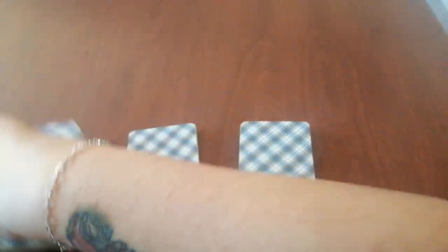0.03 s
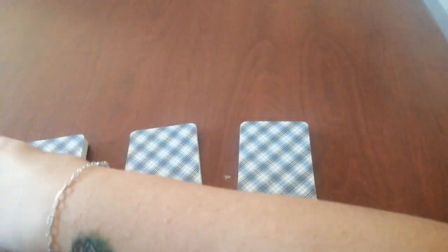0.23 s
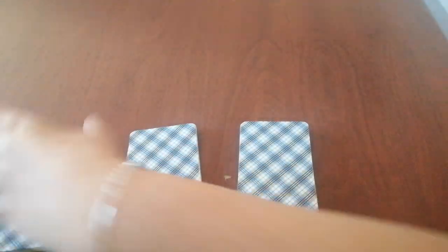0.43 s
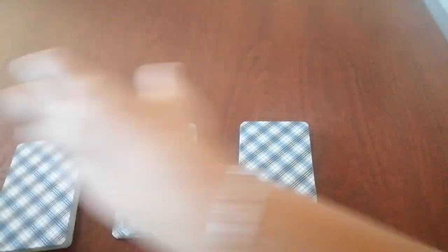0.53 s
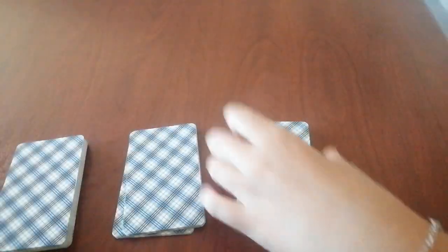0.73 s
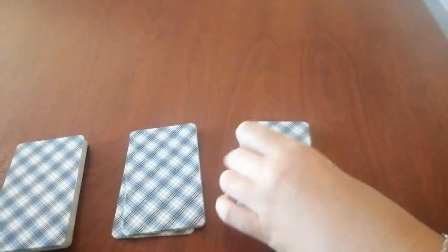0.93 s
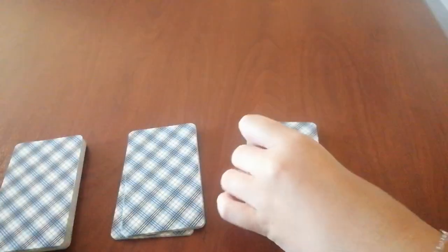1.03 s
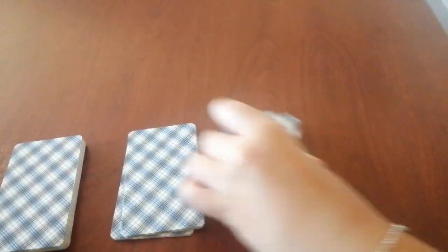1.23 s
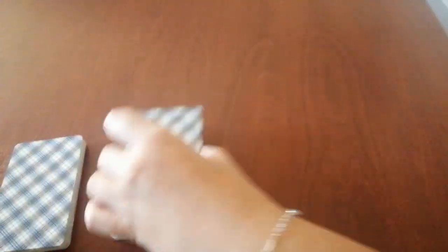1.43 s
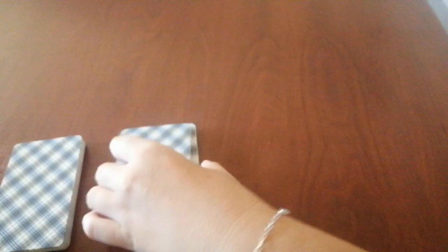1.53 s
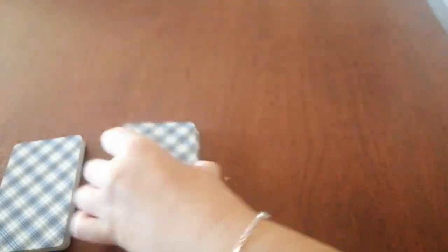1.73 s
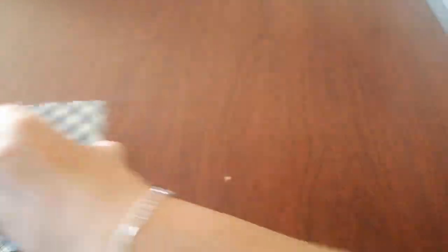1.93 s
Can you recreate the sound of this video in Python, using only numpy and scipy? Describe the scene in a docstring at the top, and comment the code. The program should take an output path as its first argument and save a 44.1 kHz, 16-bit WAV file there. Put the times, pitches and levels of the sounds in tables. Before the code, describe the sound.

Two close knuckle raps thud on cards lying on a wooden table, about a second and a half apart, the first with a bracelet click. Faint card rustle and low room noise lie between them in a small, echoing room.

```python
"""In a small, echoing room, a fist raps twice on playing cards lying on a wooden table, close by.
The knuckles land one after another, clap the cards and set the table top booming.
Just after the first rap, a metal bracelet clicks on the wood. The swinging arm pushes a little air,
and the hand brushes faintly over the cards around the raps, above low room noise."""
import sys
import numpy as np
from scipy import signal
from scipy.fft import rfft, irfft
from scipy.io import wavfile
from scipy.ndimage import uniform_filter1d

SR = 44100
rng = np.random.default_rng(int(sys.argv[2]) if len(sys.argv) > 2 else 0)


def store_wav(level_fs):
    """Save 16-bit WAV to argv[1]."""
    pcm = np.round(np.clip(np.atleast_2d(level_fs), -1, 1) * 32767)
    wavfile.write(sys.argv[1], SR, pcm.T.astype(np.int16))


N = 88200
T = np.arange(N) / SR


def amp(db):
    """Turns decibels into a gain."""
    return 10 ** (np.asarray(db) / 20)


def unit(x):
    """Scales a sound to an average power of one."""
    return x / np.sqrt(np.mean(x ** 2) + 1e-20)


def read(points, hz):
    """Looks up a table's value at any frequency."""
    f, value = np.transpose(points)
    return np.interp(np.log(hz + 1), np.log(f), value)


def pan(db):
    """Left and right gains; positive dB leans left."""
    return amp(np.array([[db], [-db]]) / 2)


def swell(s, width):
    """A bell-shaped rise and fall, peaking at s seconds."""
    return np.exp(-.5 * ((T - s) / width) ** 2)


def fade(t, fade_s):
    """Dies away by 60 dB in the fade time."""
    return np.exp(-np.log(1000) * t / fade_s)


def add(mix, s, sound):
    """Mixes a sound in at s seconds."""
    part = mix[:, round(s * SR):][:, :sound.shape[-1]]
    part += sound[..., :part.shape[-1]]


def convolve(x, response):
    """Plays x through something, given its answer to one tap."""
    return signal.fftconvolve(np.atleast_2d(x), np.atleast_2d(response), axes=1)[:, :N]


def colour(x, tone, size=4096):
    """Gives x a tone without smearing it earlier in time."""
    log_gain = np.log(amp(read(tone, abs(np.fft.fftfreq(size, 1 / SR)))))
    response = np.fft.ifft(np.exp(np.conj(signal.hilbert(log_gain)))).real
    return convolve(x, response[:size // 2])


def pair(likeness):
    """White noise, left and right: likeness 1 is the same, 0 unrelated, -1 opposite."""
    a, b = rfft(rng.standard_normal((2, N)))
    alike = np.clip(read(likeness, np.fft.rfftfreq(N, 1 / SR)), -1, 1)
    mid, side = a * np.sqrt((1 + alike) / 2), b * np.sqrt((1 - alike) / 2)
    return irfft(np.array([mid + side, mid - side]), N)


def noise(tone):
    """Steady noise with the given tone, its bass alike on both sides."""
    # Each row: frequency in Hz, left-right likeness.
    likeness = [(30, 0.74), (200, 0.93), (600, 0.2), (1500, 0), (5000, 0), (15000, 0.02)]
    gain = amp(read(tone, np.fft.rfftfreq(N, 1 / SR)))
    return unit(irfft(rfft(pair(likeness)) * gain, N))


def room_noise(level_db=-56):
    """A low, steady rumble with a faint hiss."""
    # Each row: frequency in Hz, relative level in dB.
    tone = [(20, -2.5), (45, -3), (81, -7.5), (125, -3.5), (170, -3.5), (270, -11.5), (350, -12.5),
            (470, -23), (610, -21), (1000, -26.5), (1800, -31.5), (2800, -28.5), (4000, -37.5), (5300, -31),
            (7000, -34.5), (10000, -39.5), (14000, -35.5), (14900, -25.5), (15500, -55.5), (16000, -25)]
    return amp(level_db) * noise(tone) * pan(-2)


def arm_air(level_db=-51.5):
    """The swinging arm pushes air in one soft, deep puff."""
    # Each row: frequency in Hz, relative level in dB.
    tone = [(15, 12), (30, -7), (55, -3), (150, -5), (1000, -73)]
    return amp(level_db) * swell(s=0.048, width=0.091) * noise(tone)


def brushes(grain_db=3):
    """Skin slides over card: a soft rub and a grainy hiss."""
    # Each row: peak time in seconds, width in seconds, rub level in dB, hiss against rub in dB.
    strokes = [(0.093, 0.034, -69, -5.5), (0.185, 0.042, -64.5, -9.5), (1.127, 0.024, -59, -8.5),
               (1.262, 0.033, -57.5, -34), (1.328, 0.0069, -57, -17), (1.343, 0.0079, -71, 10.5),
               (1.728, 0.067, -66, -1.5)]
    # Each row of both: frequency in Hz, relative level in dB.
    rub_tone = [(40, -25), (150, 7.5), (320, 0), (600, -9.5), (1500, -15), (4000, -52), (16000, -62)]
    hiss_tone = [(200, -44), (1600, -1), (3000, -2), (4000, -6.5), (5500, 1), (8000, -9.5), (11000, -14),
                 (15000, -20), (16000, -30)]
    grains = rng.standard_normal((2, N)) * amp(grain_db * np.minimum(rng.exponential(1, N), 5))
    rub, hiss = noise(rub_tone), unit(colour(grains, hiss_tone))
    return sum(swell(s, width) * amp(db) * (rub + amp(hiss_db) * hiss)
               for s, width, db, hiss_db in strokes)


def knuckles():
    """Each knuckle gives a rounded push: a thud, a clap of the cards and the ring of the table top."""
    # Each row: start in seconds, push strength in dB, hardness in Hz, lean to the left in dB,
    # clap strength in dB, clap length in seconds.
    landings = [(0.2186, -1.5, 1770, 6.5, -10, 0.00058), (0.2251, 0, 1200, 10, -6.5, 0.0013),
                (1.6280, -6.5, 1600, -3, -26.5, 0.0023), (1.6306, -4, 3130, 2.5, -21.5, 0.0059),
                (1.6443, -0.5, 390, -2, -26.5, 0.0041), (1.6521, -2, 178, -19, -31, 0.012),
                (1.6752, -4.5, 250, -19, -40, 0.012)]
    # Each row of both: frequency in Hz, gain in dB.
    thud_tone = [(25, -24), (48, -17), (64, 3.5), (170, 7), (230, 5.5), (300, 3), (400, 1.5), (500, -3.5),
                 (620, 2.5), (950, -2), (1350, -2), (1900, -16), (3000, -14.5), (4300, -35), (16000, -53)]
    clap_tone = [(300, -31), (1500, -21), (2800, -8), (4200, -16.5), (5400, -2.5), (6800, -6.5),
                 (8700, -11), (11000, -22.5), (14500, -30), (16000, -50)]
    force, claps, ring = np.zeros((2, N)), np.zeros((2, N)), np.zeros((1, N))
    t = T[:SR // 25]
    for s, db, hard_hz, pan_db, clap_db, clap_s in landings:
        push = t * np.exp(-2 * np.pi * hard_hz * t)  # harder means shorter and brighter
        push = -amp(db) * push / push.sum()
        add(force, s, pan(pan_db) * push)
        add(ring, s, convolve(push, table_top()))
        burst = rng.standard_normal((2, len(t))) * t * np.exp(-2 * t / clap_s)
        clap = unit(burst) / np.sqrt(len(t))
        add(claps, s, amp(clap_db) * pan(pan_db + 1.5) * clap)
    return colour(force, thud_tone) + colour(claps, clap_tone), ring * pan(-3.5)


def table_top(scatter_hz=347.6, build_s=0.0013):
    """One tap rings the wood at many pitches, building as bending waves fill the top."""
    # Each entry: a pitch in Hz.
    pitches = [59.2, 112, 135, 167, 215, 271, 321, 391, 617, 726, 782, 903, 1063, 1234, 1402]
    # Each row, one per pitch: level in dB, fade time in seconds.
    rings = [(-38.5, 0.21), (-30, 0.43), (-45.5, 0.58), (-48, 0.75), (-41.5, 0.72), (-51, 0.75),
             (-54, 0.16), (-36.5, 0.23), (-66.5, 0.9), (-58, 0.64), (-68.5, 1), (-67.5, 0.13),
             (-72.5, 0.14), (-60, 0.9), (-61.5, 0.73)]
    t, hz = T[:SR // 2], np.array(pitches)[:, None]
    db, fade_s = np.transpose(rings)[:, :, None]
    # Each knuckle lands on another spot, so pitches above scatter_hz answer it differently.
    phase = rng.standard_normal(hz.shape) * (hz / scatter_hz) ** 2
    notes = amp(db) * fade(t, fade_s) * np.cos(2 * np.pi * hz * t + phase)
    return notes.sum(0) * (1 - np.exp(-t / build_s))


def bracelet(start_s=0.2362, hit_db=-0.5, rattle_db=-5, rattle_s=0.00095, mic_lag_s=0.00031):
    """Metal links hit the wood, rattle and ring briefly. Also returns the bare click, for the echo."""
    # Each row: pitch of a link in Hz, level in dB, fade time in seconds.
    links = [(2610, -57, 0.34), (2786, -56, 0.12), (2717, -41, 0.083), (3083, -57, 0.21),
             (5740, -65, 0.067), (6000, -63, 0.089)]
    # Each row: frequency in Hz, gain in dB.
    tone = [(100, -3), (600, -3), (1100, -7.5), (1800, -12), (2850, -1.5), (3600, -6), (4300, -13.5),
            (5500, -0.5), (6600, -11.5), (7800, -7), (10700, -21.5), (15000, -20.5), (16000, -17)]
    hit, rattle, t = np.zeros((1, N)), np.zeros((2, N)), T[:SR // 2]
    add(hit, start_s, -amp(hit_db) * (t == 0))
    burst = rng.standard_normal((2, len(t))) * np.exp(-t / rattle_s)
    add(rattle, start_s, amp(hit_db + rattle_db) * unit(burst) / np.sqrt(len(t)))
    ring = sum(amp(db) * fade(t, fade_s) * np.sin(2 * np.pi * hz * t) for hz, db, fade_s in links)
    left, right = colour(hit + rattle, tone) + convolve(hit, ring)
    right = np.roll(right, round(mic_lag_s * SR))  # reaches the right microphone later
    return np.array([left, right]) * pan(-5.5), colour(hit, tone)


def room_echo(rise_s=0.0096):
    """Sound bounces off nearby surfaces, then blurs into a tail whose treble dies first."""
    # Each row: frequency in Hz, fade time in seconds.
    fade_times = [(100, 1), (400, 1), (1200, 1), (2800, 0.9), (5500, 0.92), (8000, 0.7), (11000, 0.43),
                  (16000, 0.25)]
    # Each row: frequency in Hz, gain in dB.
    tone = [(50, -21.5), (130, -16), (210, -0.5), (300, -0.5), (390, 1.5), (480, -6), (780, -0.5),
            (1100, -3), (1500, 0), (2000, 1.5), (2800, 1.5), (4200, -3.5), (6000, -1.5), (8500, -3.5),
            (15000, 6.5)]
    # Each row: frequency in Hz, left-right likeness.
    likeness = [(100, 1), (400, 0.96), (1000, -0.29), (2200, 0.23), (5000, -0.16), (15000, -0.46)]
    hz, t, bands = signal.stft(pair(likeness), SR, nperseg=256)
    rate = np.log(1000) / read(fade_times, hz)[:, None]
    bands = bands * np.exp(-rate * t) * np.sqrt(2 * rate / SR)
    tail = signal.istft(bands, SR, nperseg=256)[1][:, :N] * (1 - np.exp(-T / rise_s))
    first_bounces = amp(-0.5) * unit(fade(T, fade_s=0.037))
    nearest_wall = amp(-10.5) * unit(swell(s=0.0136, width=0.003))
    early = (first_bounces + nearest_wall) * pair(likeness) / np.sqrt(N)
    return colour(tail + early, tone)


def suppress_noise(x, cut_db=5, open_db=8, softness_db=1):
    """Turns each frequency band down unless it rises well above its usual level."""
    bands = signal.stft(x, nperseg=512)[2]
    power = (abs(bands) ** 2).mean(0)
    power = uniform_filter1d(power, size=11, axis=0)  # smooth over frequency
    power = uniform_filter1d(power, size=4, axis=1)  # and over time
    level_db = 10 * np.log10(abs(power) + 1e-20)
    over_db = level_db - np.median(level_db, axis=1, keepdims=True)
    shut = .5 - .5 * np.tanh((over_db - open_db) / (2 * softness_db))
    return signal.istft(bands * amp(-cut_db * shut), nperseg=512)[1][:, :N]


def scene():
    """Raps, click and brushing echo in the room, over its steady noise."""
    knocks, table_ring = knuckles()
    clink, bare_click = bracelet()
    rustle = brushes()
    into_room = amp(3.5) * knocks + amp(1.5) * bare_click + amp(-0.5) * rustle
    echo = convolve(into_room.mean(0), room_echo()) * pan(-2)
    return knocks + table_ring + clink + rustle + echo + arm_air() + room_noise()


def record(dry):
    """The recorder turns down quiet noise and cuts the highest treble."""
    treble_cut = signal.firwin(511, cutoff=15900, window=("kaiser", 9), fs=SR)
    return signal.oaconvolve(suppress_noise(dry), treble_cut[None], "same")


dry = scene()
out = record(dry)
store_wav(out)
```